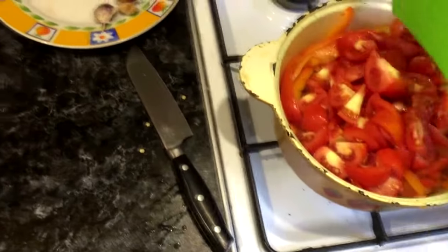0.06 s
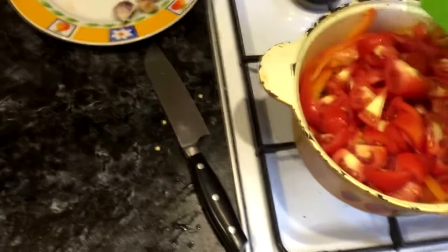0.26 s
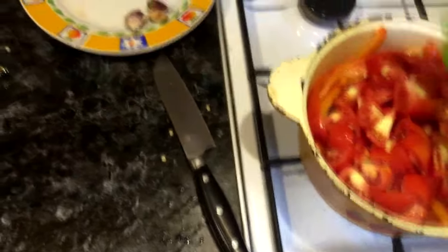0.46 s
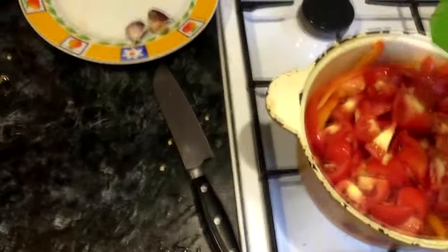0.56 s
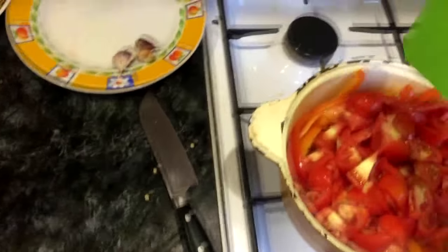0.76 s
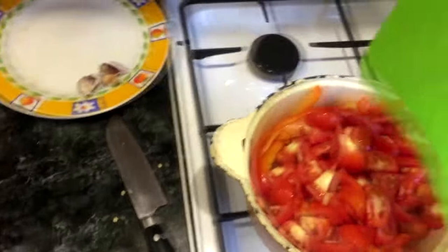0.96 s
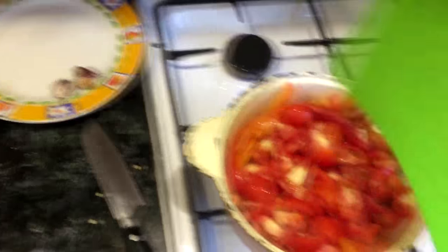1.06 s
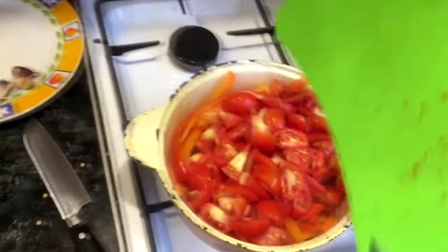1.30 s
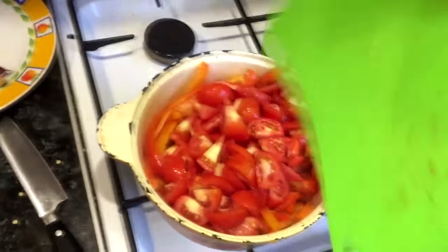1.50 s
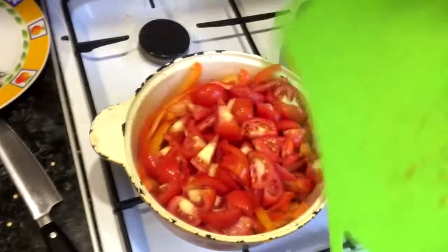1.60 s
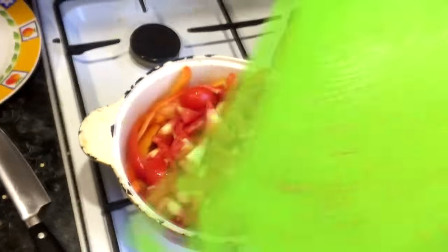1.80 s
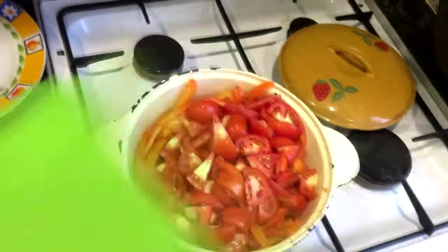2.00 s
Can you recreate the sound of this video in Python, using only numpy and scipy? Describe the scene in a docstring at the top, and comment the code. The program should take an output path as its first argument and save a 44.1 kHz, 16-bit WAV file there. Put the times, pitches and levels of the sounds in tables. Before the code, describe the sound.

Plastic cutting board knocked eight times on an enamel pot rim, over soft sizzle and burner hiss

```python
"""A plastic cutting board is knocked eight times on the rim of an enamel pot to shake off chopped tomatoes.
Each knock is a filtered click that sets off the ringing tones of board and rim, plus scattered noise.
The board grazes the rim in short runs of tiny clicks, some with a squeak; soft bumps thud and hum.
Shaped noise makes the gas burner's hiss and a low rumble; random pops and hiss make the soft sizzle.
A few spits and ticks stand out from the pan sounds, and a small kitchen adds a faint echo to the contacts."""
import sys
import numpy as np
from scipy import signal
from scipy.fft import rfft, irfft, next_fast_len
from scipy.io import wavfile

SR = 44100
rng = np.random.default_rng(int(sys.argv[2]) if len(sys.argv) > 2 else 0)


def digitize_waveform(pressure):
    """Quantize a signal to 16-bit integers and store it at the path in sys.argv[1].

    Rows of a 2-D input are taken as channels; values are limited to [-1, 1].
    """
    field = np.atleast_2d(pressure).T
    bounded = np.clip(field, -1, 1)
    quanta = np.round(bounded * 32767).astype(np.int16)
    wavfile.write(sys.argv[1], SR, quanta)


N = 90404
TIME = np.arange(N) / SR   # seconds

# the burner's hiss, relative tone curve: f/Hz, level/dB
BURNER_TONE = [(40, -45), (110, -43), (200, -31), (320, -41), (420, -26.5), (480, -33), (570, -22),
               (680, -8.5), (830, 2.5), (1080, 0), (1400, -1), (1800, -4), (2600, -8), (3400, -16),
               (5000, -23.5), (8000, -37.5), (16000, -44.5)]
# the hiss as heard from the moving microphone, before flutter: t/s, level/dB
BURNER_LEVEL = [(0, -38), (.4, -37), (1.0, -39), (1.65, -38.5), (1.9, -39.5), (2.05, -40.5)]
# low rumble as things move, relative tone curve: f/Hz, level/dB
RUMBLE_TONE = [(25, -28), (55, 1), (110, 5.5), (200, -7), (330, -1), (430, -1.5), (520, -42), (3000, -65)]
# loudness of the rumble: t/s, level/dB
RUMBLE_LEVEL = [(0, -62), (.35, -81), (.6, -55.5), (.95, -55), (1.45, -55.5), (1.66, -60), (1.8, -61.5),
                (1.9, -63), (2.05, -63)]
# frying food, relative tone curve: f/Hz, level/dB
SIZZLE_TONE = [(500, 10), (1200, -4.5), (2800, 8), (4300, -3.5), (6200, -0.5), (7500, -23), (9800, -16),
               (10500, -18.5), (11800, -12.5), (15800, -26)]
# loudness of the frying: t/s, level/dB
SIZZLE_LEVEL = [(0, -55), (.2, -50.5), (.45, -50.5), (.75, -51.5), (1.0, -52.5), (1.3, -48), (1.65, -45.5),
                (1.9, -51), (2.05, -60)]
# bright ticks of spitting fat: t/s, level/dB
FAT_TICKS = [(.583, -17), (.750, -23), (.848, -18), (1.483, -12), (1.519, -19)]
# thin hiss of steam at the very top: t/s, level/dB
STEAM_LEVEL = [(0, -85), (.3, -76), (.6, -63), (.75, -65), (.93, -62), (1.1, -67), (1.3, -85), (2.05, -85)]
# soft bumps of the board and falling food: t/s, relative thud level/dB, relative board hum level/dB
BUMPS = [(0.084, -13.5, -32), (0.167, -37, -37), (0.236, -12.5, -7.5), (0.257, -21, -11.5),
         (0.367, -15, -28), (.385, -22, -15.5), (0.573, -26, -15), (0.739, -11, -12), (0.922, -20, -11.5),
         (1.105, -15, -10.5), (1.268, -12.5, -16), (1.447, -21, -14), (1.578, -11, -34), (1.794, -14, -21)]
# sharp spits from the pot: t/s, level/dB, pitch f/Hz
SPITS = [(0.3265, 8.5, 1350), (.3460, 10.5, 1760)]
# the board grazes the rim: t/s, length/s, level/dB, relative squeak level/dB
GRAZES = [(0.494, 0.013, -32.5, -20), (.581, .012, -44, 11.5), (.735, 0.01, -29.5, 3.5),
          (0.916, 0.015, -46, 12.5), (1.107, 0.0081, -41.5, 9), (1.2655, 0.0086, -35, 8.5),
          (1.405, 0.0087, -31.5, -31), (1.568, 0.025, -32.5, -46), (1.615, 0.014, -33.5, -0.5),
          (1.785, 0.017, -32.5, 6.5)]
# scraping slips, relative tone curve: f/Hz, level/dB
GRAZE_TONE = [(200, 3), (700, -2.5), (1400, 4.5), (2100, 1.5), (2750, 4), (3500, -13), (7000, -24.5),
              (15000, -42)]
# knocks: t/s, strength level/dB, contact brightness f/Hz, lowest board tone f/Hz, then relative levels:
# thump level/dB, clack level/dB, tock level/dB, rim ring level/dB, scatter level/dB, chatter level/dB
KNOCKS = [(0.5119, -9, 2150, 246.3, 7.5, 3.5, -8, 5, 4, -3),
          (0.6736, 0, 2070, 245.7, 2.5, 2, 8.5, -4, -8.5, -1.5),
          (0.8594, -4, 2250, 246, 7.5, 4.5, 3.5, 2.5, -3.5, -3.5),
          (1.0415, -5, 3370, 251.6, 7.5, 0, 5, 7.5, -4.5, -10),
          (1.2079, -1, 2700, 242, 3, 3, -2.5, -1, -5.5, -9.5),
          (1.3826, -5, 1140, 244, 3.5, 4.5, -12, -5, 0, -7),
          (1.5470, -10, 2550, 243.2, 6.5, 4.5, 4, 12, 0.5, 0),
          (1.7275, -5.5, 3230, 240, 5.5, 1, 0.5, 8, 1.5, -21)]
# the board's ringing tones before each knock adjusts them: f/Hz, peak level/dB, time to fall 60 dB t60/s
BOARD_MODES = [(244.2, 29, 0.087), (320.5, 19, 0.065), (372, 14.5, 0.082), (458.8, 20, 0.1),
               (505.3, 16.5, 0.12), (592, 14.5, 0.13), (751, 23, 0.026), (942, 17.5, 0.019),
               (1225, 15, 0.014), (1388, 10, .022), (1650, 14, 0.022), (2054, 15, 0.034),
               (2397, 19.5, 0.011), (2617, 14.5, .012), (2894, 15.5, 0.038)]
# the rim's ringing tones before each knock's level: f/Hz, peak level/dB, time to fall 60 dB t60/s
RIM_MODES = [(3990, -15, 0.058), (4210, 3, 0.22), (5300, 3.5, 0.19), (6040, -3.5, 0.16), (7840, -27, 0.099),
             (7900, -25, .08), (8400, -11.5, 0.12), (12620, -16, .1)]
# the pot's crowded upper tones, relative tone curve: f/Hz, level/dB
RATTLE_TONE = [(1500, -26), (2600, 0), (4200, 2), (5000, -13.5), (6300, -8.5), (7400, -22), (8500, -17),
               (10500, -27), (12500, -25), (16000, -31)]

# Settings; T60 is the time to fall by 60 dB
BURNER_FLUTTER_DB = 0.96
POPS_PER_S, POP_SPREAD_DB, SIZZLE_HISS_DB, SIZZLE_CLUMP_DB = 1800, 3.5, -3.5, 2.5
TICK_HZ, TICK_T60_S, TICK_TOP_HZ = 5400, 0.0014, 7000
STEAM_LOW_HZ = 13200
BUMP_NOISE_DB, BUMP_T60_S, BUMP_LOW_HZ, BUMP_HIGH_HZ = 20, 0.2, 104, 200
BUMP_RING_DB, BUMP_RING_HZ, BUMP_RING_T60_S = 27.5, 242.5, 0.13
GRAZE_RELEASE_S, SLIPS_PER_S = 0.0057, 2500
SQUEAK_HZ, SQUEAK_WAVER_HZ, SQUEAK_DB = 1440, 45, 1.5
SQUEAK_AFTER_S, SQUEAK_WIDTH_S = 0.0028, 0.0042
CHATTER_GAP_S, CHATTER_LOSS_DB = 0.001444, 6   # the edge touches twice more as it settles
CLICK_DB, CLICK_LOW_HZ = 7, 151
KNOCK_TOP_HZ = 3330   # upper limit of the knock's board sound
THUMP_BELOW_HZ, CLACK_BELOW_HZ, TOCK_BELOW_HZ = 650, 1100, 1900
BENDING_DELAY_S = 0.00139   # travel time of a 1 kHz bending wave through the board
RATTLE_DB, RATTLE_T60_S = -4, 0.15
SCATTER_DB, SCATTER_T60_S, SCATTER_LOW_HZ = -3, 0.11, 320   # reflections from pot, hob and wall
ROOM_DB, ROOM_T60_S, ROOM_LOW_HZ = -14, 0.35, 650
MIC_LOW_HZ, CUTOFF_HZ = 45.3, 15950


def from_db(db):
    """Turn decibels into a multiplying factor."""
    return 10 ** (np.asarray(db) / 20)


def rms_one(x):
    """Scale a sound to an average strength (rms) of 1."""
    return x / np.sqrt(np.mean(x ** 2) + 1e-20)


def cut(x, hz, kind, order=2):
    """Keep what lies below ("low") or above ("high") a frequency, with a smooth Butterworth filter."""
    sos = signal.butter(order, min(hz, .45 * SR), kind, fs=SR, output="sos")
    return signal.sosfilt(sos, x + 1e-18)


def colour(x, points):
    """Shape a sound's tone by a curve of frequency and decibels."""
    hz, db = np.transpose(points)
    size = next_fast_len(2 * len(x))
    f = np.fft.rfftfreq(size, 1 / SR) + 1   # the 1 avoids log(0)
    gain = from_db(np.interp(np.log(f), np.log(hz), db))
    return irfft(rfft(x, size) * gain, size)[:len(x)]


def resonate(x, hz, t60):
    """Ring at one pitch like a struck object, with a gain of 1 at the peak."""
    r = np.exp(-np.log(1000) / (t60 * SR))
    feed = np.array([1, 0, -1]) * (1 - r * r) / 2
    feedback = [1, -2 * r * np.cos(2 * np.pi * hz / SR), r * r]
    return signal.lfilter(feed, feedback, x + 1e-18)


def impulse():
    """Make a single click followed by silence."""
    return signal.unit_impulse(2 ** 14)


def dying_noise(t60):
    """Make noise that fades exponentially, with a total energy of 1."""
    t = TIME[:len(impulse())]
    tail = rng.standard_normal(len(t)) * np.exp(-np.log(1000) * t / t60)
    return tail / np.linalg.norm(tail)


def grains(per_s, spread_db):
    """Scatter clicks of uneven size at random times, with an rms of 1."""
    sizes = from_db(spread_db * np.minimum(rng.exponential(1, N), 5))
    signed = sizes * rng.choice([-1, 1], N)
    return rms_one(signed * (rng.random(N) < per_s / SR))


def wander(hz):
    """Drift randomly, no faster than about hz, with an rms of 1."""
    return rms_one(cut(rng.standard_normal(N), hz, "low"))


def level(curve):
    """Turn a curve of seconds and decibels into a smooth volume change."""
    return from_db(np.interp(TIME, *np.transpose(curve)))


def add(out, s, sound):
    """Mix a sound in, starting at s seconds."""
    start = int(s * SR)
    out[start:start + len(sound)] += sound[:N - start]


def burner():
    """Rushing gas is shaped noise that flutters slightly, over the low rumble of moving things."""
    hiss = rms_one(colour(rng.standard_normal(N), BURNER_TONE))
    flutter = from_db(BURNER_FLUTTER_DB * wander(17))
    rumble = rms_one(colour(rng.standard_normal(N), RUMBLE_TONE))
    return level(BURNER_LEVEL) * flutter * hiss + level(RUMBLE_LEVEL) * rumble


def sizzle():
    """Frying food gives clumps of tiny pops on a fine hiss; fat ticks brightly and steam hisses on top."""
    clumps = from_db(SIZZLE_CLUMP_DB * wander(27))
    pops = grains(POPS_PER_S, POP_SPREAD_DB) * clumps
    fine_hiss = from_db(SIZZLE_HISS_DB) * rng.standard_normal(N)
    out = level(SIZZLE_LEVEL) * rms_one(colour(pops + fine_hiss, SIZZLE_TONE))
    for s, db in FAT_TICKS:
        tick = cut(resonate(impulse(), TICK_HZ, TICK_T60_S), TICK_TOP_HZ, "low", order=4)
        add(out, s, from_db(db) * tick)
    steam = rms_one(cut(rng.standard_normal(N), STEAM_LOW_HZ, "high", order=4))
    return out + level(STEAM_LEVEL) * steam


def bumps():
    """Soft contacts make a dull noisy thud and leave the board's lowest tone humming."""
    out = np.zeros(N)
    hum = from_db(BUMP_RING_DB) * resonate(impulse(), BUMP_RING_HZ, BUMP_RING_T60_S)
    for s, thud_db, hum_db in BUMPS:
        thud = cut(dying_noise(BUMP_T60_S), BUMP_HIGH_HZ, "low")
        thud = cut(thud, BUMP_LOW_HZ, "high", order=3)
        add(out, s, from_db(BUMP_NOISE_DB + thud_db) * thud + from_db(hum_db) * hum)
    return out


def spits():
    """Single bursting bubbles ring for only a few cycles."""
    out = np.zeros(N)
    for s, db, hz in SPITS:
        bubble = cut(resonate(impulse(), hz, t60=0.0046), 2130, "low")
        add(out, s, from_db(db) * bubble)
    return out


def grazes():
    """The board sticks and slips along the rim in tiny clicks; some runs lock into a short squeak."""
    out = np.zeros(N)
    slips = rms_one(colour(grains(SLIPS_PER_S, spread_db=-2), GRAZE_TONE))
    squeak_hz = SQUEAK_HZ + SQUEAK_WAVER_HZ * wander(210)
    squeak = np.sin(2 * np.pi * np.cumsum(squeak_hz) / SR)
    for s, length, db, squeak_db in GRAZES:
        rise = np.clip(2 * (TIME - s) / length + .5, 0, 1)
        fade = np.exp(-np.maximum(TIME - s - length / 2, 0) / GRAZE_RELEASE_S)
        stick = np.exp(-((TIME - s - SQUEAK_AFTER_S) / SQUEAK_WIDTH_S) ** 2)   # bell-shaped swell
        squeak_gain = from_db(SQUEAK_DB + squeak_db)
        out += from_db(db) * (rise * fade * slips + squeak_gain * stick * squeak)
    return out


def contact(contact_hz, chatter_db):
    """The force of one knock is a first touch and two more, softened by the plastic."""
    force = impulse()
    for k in range(2):
        delay_s = (k + 1) * CHATTER_GAP_S * rng.uniform(.9, 1.1)
        force[int(delay_s * SR)] += from_db(chatter_db - k * CHATTER_LOSS_DB)
    return cut(force, contact_hz, "low", order=4)


def bend(x):
    """Bending waves in the board carry the treble faster than the bass."""
    f = np.fft.rfftfreq(len(x), 1 / SR)
    delay_phase = np.exp(-4j * np.pi * BENDING_DELAY_S * np.sqrt(1000 * f))
    return irfft(rfft(x) * delay_phase)


def knocks():
    """Each contact clicks, rings board and rim, and scatters nearby; the grip retunes the board a little."""
    out = np.zeros(N)
    for (s, db, contact_hz, thump_hz, thump_db, clack_db, tock_db,
         rim_db, scatter_db, chatter_db) in KNOCKS:
        click = cut(contact(contact_hz, chatter_db), CLICK_LOW_HZ, "high")
        board = from_db(CLICK_DB) * click
        force = cut(impulse(), contact_hz, "low", order=4)   # the first touch alone rings the board
        retune = thump_hz / BOARD_MODES[0][0]
        for hz, mode_db, t60 in BOARD_MODES:
            if hz < THUMP_BELOW_HZ:
                place_db = thump_db
            elif hz < CLACK_BELOW_HZ:
                place_db = clack_db
            elif hz < TOCK_BELOW_HZ:
                place_db = tock_db
            else:
                place_db = 0
            board += from_db(mode_db + place_db) * resonate(force, hz * retune, t60)
        board = bend(cut(board, KNOCK_TOP_HZ, "low", order=6))

        rim = sum(from_db(mode_db) * resonate(impulse(), hz, t60) for hz, mode_db, t60 in RIM_MODES)
        rim += from_db(RATTLE_DB) * colour(dying_noise(RATTLE_T60_S), RATTLE_TONE)

        scatter = signal.fftconvolve(board, dying_noise(SCATTER_T60_S))[:len(board)]
        scatter = cut(scatter, SCATTER_LOW_HZ, "high")
        knock = board + from_db(rim_db) * rim + from_db(SCATTER_DB + scatter_db) * scatter
        add(out, s, from_db(db) * knock)
    return out


def kitchen_echo(hits):
    """The small room smears the contact sounds into a short fading tail without bass."""
    tail = signal.fftconvolve(cut(hits, ROOM_LOW_HZ, "high"), dying_noise(ROOM_T60_S))[:N]
    return from_db(ROOM_DB) * tail


def scene():
    """Board and pot sound in the kitchen, over the sound of cooking."""
    cooking = burner() + sizzle()
    hits = bumps() + spits() + grazes() + knocks()
    return (hits + kitchen_echo(hits) + cooking)[None]   # one channel


def record(dry):
    """The microphone loses the deep bass; the top is cut steeply."""
    without_bass = cut(dry, MIC_LOW_HZ, "high", order=3)
    top_cut = signal.firwin(511, CUTOFF_HZ, fs=SR)[None]
    return signal.fftconvolve(without_bass, top_cut, "same")


dry = scene()
out = record(dry)
digitize_waveform(out)
```